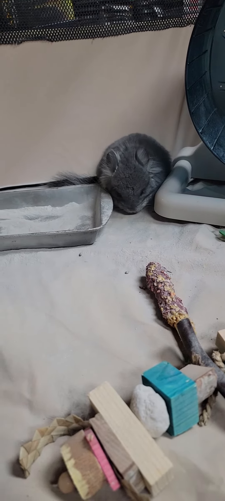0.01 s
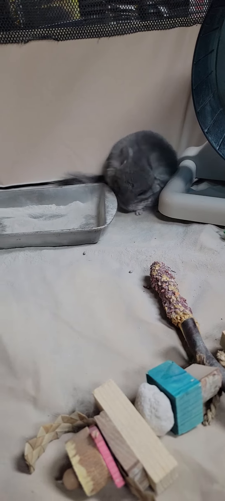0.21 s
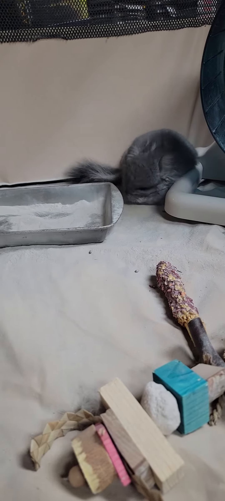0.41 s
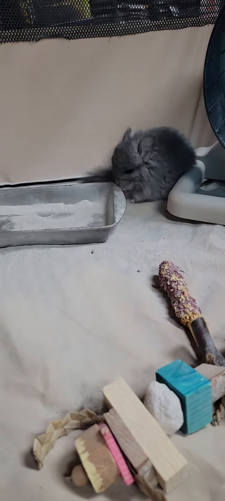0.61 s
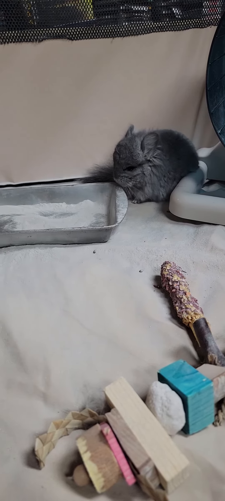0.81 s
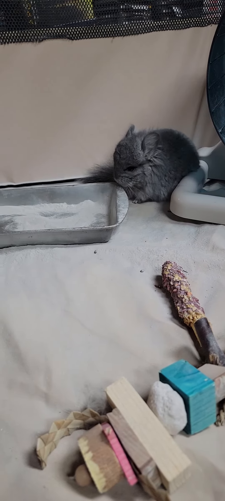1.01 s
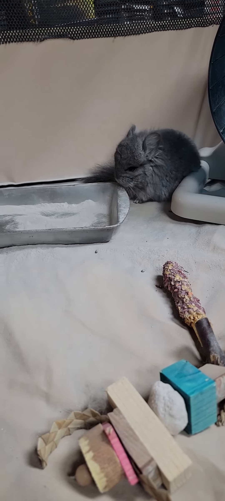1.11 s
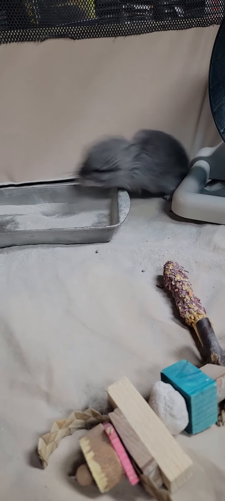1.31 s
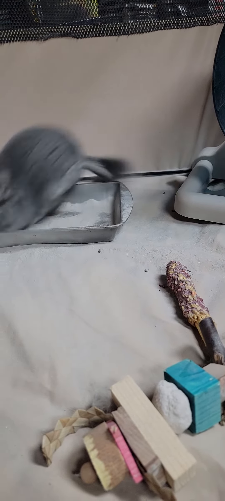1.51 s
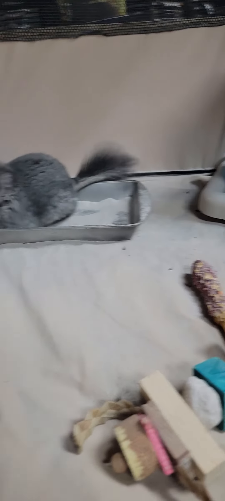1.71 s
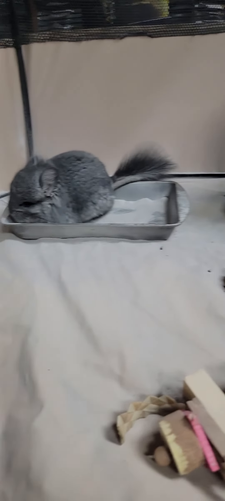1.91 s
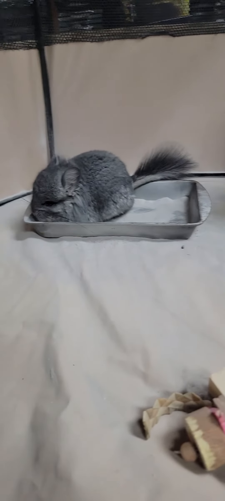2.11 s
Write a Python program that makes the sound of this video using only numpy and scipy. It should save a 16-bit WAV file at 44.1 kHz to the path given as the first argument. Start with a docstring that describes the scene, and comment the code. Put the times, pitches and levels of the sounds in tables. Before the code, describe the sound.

Scratchy claw and fur scuffling on cloth, near silence, then a quick clattering hop into a dust tray

```python
"""Small animal hopping into a dust tray

A small furry animal scuffles on a fabric floor beside a metal tray, pauses, then hops into the dust.
Claws, fur and dust are grains and fine noise under short swells; claw taps and tray knocks are dying sines.
Paws thud as puffs of low noise; low swings bump the hand-held phone over a quiet room of shaped noise."""
import sys
import numpy as np
from scipy import signal
from scipy.fft import rfft, irfft
from scipy.io import wavfile
from scipy.ndimage import uniform_filter1d

SR = 44100
rng = np.random.default_rng(int(sys.argv[2]) if len(sys.argv) > 2 else 0)


def level_to_linear(level):
    """Convert decibel levels to linear amplitude factors, elementwise."""
    exponent = np.asarray(level, float) / 20
    return 10 ** exponent


def waveform_to_disk(signal):
    """Save audio, clipped to [-1, 1], as 16-bit WAV at the path in sys.argv[1]."""
    frames = np.transpose(np.atleast_2d(signal))
    scaled = np.clip(frames, -1, 1) * 32767
    samples = np.round(scaled).astype(np.int16)
    wavfile.write(sys.argv[1], SR, samples)


N = 97020
HZ = np.fft.rfftfreq(N, 1 / SR)
HOP_S = 1.45  # rubs and hits before this take the fabric's colour and lag, later ones the dust's

# resonances of a claw tap: pitch_hz, level_db (before the favoured pitch weighs in), t60_s
TAP_MODES = [(1270, 2, 0.018), (1648, 2.5, 0.0074), (1848, 2, 0.021), (2210, 2.5, 0.018), (2602, 7, 0.016),
             (3302, 10.5, 0.013), (3770, 1.5, 0.063)]


def read(points, hz):
    """Reads a curve of (Hz, value) points on a log pitch scale."""
    f, value = np.transpose(points)
    return np.interp(np.log(hz + 1), np.log(f + 1), value)


def evened(x):
    """Scales to an rms of 1."""
    return x / np.sqrt(np.mean(x ** 2) + 1e-20)


def add(mix, s, sound):
    """Adds a sound into the mix from time s, cut at the end."""
    part = mix[round(s * SR):][:len(sound)]
    part += sound[:len(part)]


def causal(gain):
    """Minimum-phase filter: the same gain with no sound before the cause."""
    cepstrum = irfft(np.log(gain), N)
    fold = np.sign(N / 2 - np.arange(N)) + (np.arange(N) > 0)
    return np.exp(rfft(cepstrum * np.clip(fold, 0, 2)))


def rub_level(rubs, column):
    """Each rub swells and fades around its peak; their powers add."""
    t = np.arange(N) / SR
    power = 0
    for row in rubs:
        peak_s, rise_s, fall_s = row[:3]
        before = t < peak_s
        distance = abs((t - peak_s) / np.where(before, rise_s, fall_s))
        steepness = np.where(before, 2, 1.9)
        power = power + level_to_linear(row[column]) ** 2 * np.exp(-distance ** steepness)
    return np.sqrt(power)


def snags(clicks):
    """Each claw grain snags and rings one of the upper tap resonances, picked by chance."""
    t60_s = 0.08
    t, pick = np.arange(1500) / SR, rng.integers(1, len(TAP_MODES), N)
    out = 0
    for k in range(1, len(TAP_MODES)):
        tone = level_to_linear(-60 * t / t60_s) * np.sin(2 * np.pi * TAP_MODES[k][0] * t)
        tone = tone / np.linalg.norm(tone)
        out = out + signal.oaconvolve(clicks * (pick == k), tone[None], axes=1)[:, :N]
    return out


def rustle(rubs, colour, apart):
    """Paws and fur rub: random grains and fine noise, claws low and dust high, partly different per port."""
    # claws, then dust: grains_per_s, size_spread_db, grain_share (of the power; the rest is fine noise)
    grain_kinds = [(805, 4.5, 0.55), (4230, 4.5, 0.52)]
    split_hz, alike_hz, snag_db = 4600, 925, -2
    shape = causal(level_to_linear(read(colour, HZ)))
    phase = shape / abs(shape)
    # the ports hear a rub more alike below alike_hz
    apart = apart / (1 + (alike_hz / (HZ + 1)) ** 2)
    low = 1 / (1 + (HZ / split_hz) ** 10)
    bands = low, 1 - low
    out = 0
    for k, (per_s, spread_db, share) in enumerate(grain_kinds):
        level = rub_level(rubs, 3 + k)
        # row 0 reaches both ports, rows 1 and 2 one port each
        size = level_to_linear(spread_db * np.minimum(rng.exponential(1, (3, N)), 4))
        size = size * rng.choice([-1, 1], (3, N))
        struck = rng.random((3, N)) < per_s / SR
        grains = np.sqrt(share) * evened(size * struck) * level
        fine = np.sqrt(1 - share) * rng.standard_normal((3, N)) * level
        z = phase * evened(abs(shape) * np.sqrt(bands[k])) * rfft(grains + fine)
        if k == 0:
            z = z + level_to_linear(snag_db) * rfft(snags(grains)) * shape / abs(shape).max()
        out = out + np.sqrt(1 - apart) * z[0] + np.sqrt(apart) * z[1:]
    return irfft(out, N)


def ring(modes, favoured_hz):
    """A struck object: dying sines with a soft start, strongest near the pitch that the blow favours."""
    t = np.arange(6000) / SR
    x = 0
    for hz, db, t60_s in modes:
        loss_db = 39 * np.log2(hz / favoured_hz) ** 2  # 39 dB at one octave away
        x = x + level_to_linear(db - loss_db - 60 * t / t60_s) * np.sin(2 * np.pi * hz * t)
    x = x * np.minimum(t / 0.00045, 1)
    return x / abs(x).max()


def claw_taps():
    """Each claw tap is a short ring with a bright noise tick at its start."""
    # claw taps: start_s, level_db (of the ring, ahead of echoes, port balance and mix gain), favoured_hz
    tap_list = [(.149, -52.5, 2180), (0.2415, -29.5, 2430), (0.2514, -29.5, 2610), (0.294, -41.5, 1940),
                (0.5888, -49, 1980), (.63, -53, 2210), (0.6715, -67, 2170), (.781, -59, 2170),
                (1.2352, -47.5, 1300), (1.2504, -50, 1240), (1.319, -54.5, 1270), (1.3958, -25, 1780),
                (1.3966, -33.5, 3200), (1.547, -33.5, 3360), (1.5712, -32.5, 2580)]
    tick_db, tick_fall_s = -18.5, 0.0041
    fade = np.exp(-np.arange(6000) / SR / tick_fall_s)
    hits = []
    for s, db, hz in tap_list:
        tick = signal.lfilter([1, -1], [1, -.8], rng.standard_normal(6000)) * fade
        hits.append((s, level_to_linear(db) * (ring(TAP_MODES, hz) + level_to_linear(tick_db) * tick)))
    return hits


def tray_knocks():
    """The metal tray rings in a few low resonances when knocked."""
    # knocks: start_s, level_db (ahead of echoes, port balance and mix gain), favoured_hz
    knock_list = [(0.316, -44, 532), (1.5078, -27.5, 900), (1.527, -33, 444)]
    # resonances of the tray: pitch_hz, level_db (before the favoured pitch weighs in), t60_s
    tray_modes = [(309, 0, 0.047), (535, -0.5, 0.042), (710, -0.5, 0.097), (790, 3.5, 0.075),
                  (976, 4.5, 0.041)]
    return [(s, level_to_linear(db) * ring(tray_modes, hz)) for s, db, hz in knock_list]


def echoed(hits, first_s, last_s):
    """Hits between two times, each with its own short scatter of dull echoes on each port."""
    echo_db, echo_t60_s, echo_top_hz = -11.5, 0.1, 4170
    out, t = np.zeros((2, N)), np.arange(6000) / SR
    dull = signal.butter(1, echo_top_hz, fs=SR)
    for s, hit in hits:
        if not first_s < s < last_s:
            continue
        echo = signal.lfilter(*dull, rng.standard_normal((2, 6000)) * level_to_linear(-60 * t / echo_t60_s))
        for port in range(2):
            scatter = echo[port] / np.linalg.norm(echo[port])
            add(out[port], s, hit + level_to_linear(echo_db) * signal.fftconvolve(hit, scatter)[:6000])
    return out


def thuds():
    """Paws on the fabric: short dull puffs of low noise."""
    # soft thuds: start_s, level_db (noise rms at the swell's top, ahead of port balance and mix gain)
    thud_list = [(0.346, -55), (.501, -57.5), (.59, -61), (.675, -58), (.718, -58)]
    rise_s, band_hz = 0.0075, (106, 640)
    out, t = np.zeros(N), np.arange(4000) / SR / rise_s
    band = signal.butter(2, band_hz, "band", fs=SR)
    for s, db in thud_list:
        puff = evened(signal.lfilter(*band, rng.standard_normal(4000)))
        add(out, s, level_to_linear(db) * t * np.exp(1 - t) * puff)
    return out


def ports(x, lag):
    """Sound reaches the two ports with a lag and a balance that depend on pitch."""
    # balance of the ports: pitch_hz, left_minus_right_db
    balance = [(250, -9.5), (1000, 6), (3000, -2.5), (8000, 4), (13000, -1.5)]
    f, rad = np.transpose(lag)
    half = np.exp(.5j * np.interp(HZ, f, rad)) * level_to_linear(read(balance, HZ) / 2)
    return irfft(rfft(x) * [half, 1 / half], N)


def bumps():
    """Low swings of the hand-held body, the same on both ports but stronger on the right."""
    # bumps: centre_s, pitch_hz, peak_db (midway between the ports), rise_s, fall_s
    swings = [(0.061, 42.6, -46, 0.11, 0.052), (0.559, 45.9, -23.5, 0.027, 0.011),
              (0.611, 55.4, -38, 0.035, 0.055), (0.672, 61, -31, 0.0033, 0.004),
              (1.141, 58.3, -45, 0.068, 0.065), (1.66, 37.2, -43, 0.03, 0.042)]
    t = np.arange(N) / SR
    x = 0
    for s, hz, db, rise_s, fall_s in swings:
        swell = np.exp(-.5 * ((t - s) / np.where(t < s, rise_s, fall_s)) ** 2)
        x = x + level_to_linear(db) * np.cos(2 * np.pi * hz * (t - s)) * swell
    return x * level_to_linear(np.array([[-1.5], [1.5]]))


def room():
    """Steady rumble and hiss: shaped noise with slight drifting patches, partly shared by the ports."""
    # colour of the room: pitch_hz, relative_db (per Hz)
    room_colour = [(20, -6.5), (60, 0.5), (123, -13.5), (328, -22), (400, -30.5), (607, -23), (850, -32.5),
                   (1360, -28.5), (1900, -36), (4000, -44.5), (7000, -49), (9000, -65.5), (13500, -53.5)]
    # likeness of the ports: pitch_hz, likeness (1 same, 0 unrelated, -1 opposite)
    room_same = [(130, 0.97), (250, 0.24), (600, -0.79), (1300, -0.46), (4000, -0.021)]
    room_db, patch_db = -54.5, 1.39  # rms levels
    frames, hz = N // 512 + 5, np.fft.rfftfreq(2048, 1 / SR)
    a, b, c, d, patches = rng.standard_normal((frames, 1025, 5)).T
    patches = evened(uniform_filter1d(uniform_filter1d(patches, 20, 0), 6, 1))
    same = read(room_same, hz)[:, None]
    left, other = a + 1j * b, c + 1j * d
    z = np.array([left, same * left + np.sqrt(1 - same ** 2) * other])
    port_db = np.array([-.9, .9])[:, None, None]
    z = z * level_to_linear(read(room_colour, hz)[:, None] + patch_db * patches + port_db)
    x = signal.istft(z, nperseg=2048, noverlap=1536)[1][:, 1024:N + 1024]
    return level_to_linear(room_db) * evened(x)


def scene():
    """The animal beside the tray, then in it, over the room."""
    # rubs of paws and fur, levels ahead of port balance and mix gain:
    # peak_s, rise_s, fall_s, claw_scrape_db, fur_and_dust_hiss_db
    rubs = [(0.189, 0.0097, 0.014, -56, -63), (0.236, 0.012, 0.011, -40.5, -42.5),
            (0.248, 0.0054, 0.008, -39, -44), (0.334, 0.02, 0.012, -46, -55),
            (0.351, 0.017, 0.0072, -40.5, -49.5), (0.373, 0.015, 0.0071, -47.5, -49.5),
            (0.411, 0.0093, 0.023, -52, -55.5), (0.424, 0.0022, 0.0089, -45, -53),
            (.475, 0.057, 0.016, -53.5, -55.5), (0.526, 0.0074, 0.0091, -54, -55),
            (.631, 0.006, 0.0033, -67, -59.5), (0.676, 0.0095, 0.0051, -59.5, -66.5),
            (0.701, 0.31, 0.05, -70, -68.5), (0.741, 0.0033, 0.013, -68.5, -65),
            (0.783, 0.0043, 0.029, -70, -66), (0.866, 0.027, 0.026, -76.5, -76.5),
            (1.242, 0.014, 0.022, -67.5, -71.5), (1.32, 0.033, 0.016, -71.5, -69),
            (1.362, 0.0079, 0.042, -69, -68.5), (1.399, 0.0014, 0.0066, -53, -50.5),
            (1.508, 0.0033, 0.012, -41.5, -49.5), (1.563, 0.025, 0.017, -41, -41),
            (1.589, .012, 0.0099, -43, -45.5), (1.636, 0.045, 0.022, -68.5, -72.5),
            (2.2, 0.026, .02, -77, -74.5)]
    # colour of the rubs on the fabric, then in the dust: pitch_hz, relative_db
    scuffle_colour = [(600, -33.5), (1050, -10), (1600, -11), (2240, -1.5), (2900, -6), (3900, -11.5),
                      (5200, -23), (6500, -24.5), (10000, -34), (13700, -24.5), (16000, -29.5)]
    hop_colour = [(400, -12.5), (800, 1.5), (2620, -6), (4500, -5), (7500, -9), (10000, -12), (13000, -9),
                  (16000, -9)]
    # how far the right port lags, beside the tray, then in it: pitch_hz, lag_radians
    lag_beside = [(0, -42), (250, 0.43), (1000, 2.5), (1500, 1.24), (4000, 2), (10000, 8), (16000, 9)]
    lag_in_tray = [(0, -10.5), (250, 1), (900, 2.5), (1900, 0.34), (5000, 2.5), (9000, 10), (16000, 10)]
    hits = claw_taps() + tray_knocks()
    # the last setting is the share of a rub's treble that differs between the ports
    beside = rustle([r for r in rubs if r[0] < HOP_S], scuffle_colour, 0.57)
    beside = beside + echoed(hits, 0, HOP_S) + thuds()
    inside = rustle([r for r in rubs if r[0] > HOP_S], hop_colour, 0.83)
    inside = inside + echoed(hits, HOP_S, 10)
    animal = ports(beside, lag_beside) + ports(inside, lag_in_tray)
    return level_to_linear(2.5) * animal + bumps() + room()


def band_limit(x):
    """A steep low-pass at the top of the band."""
    return signal.sosfilt(signal.butter(12, 16430, fs=SR, output="sos"), x)


def record(dry):
    """The phone takes down the finished mix."""
    return band_limit(dry)


dry = scene()
out = record(dry)
waveform_to_disk(out)
```